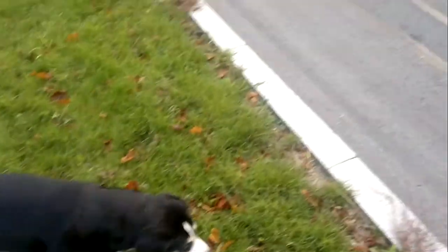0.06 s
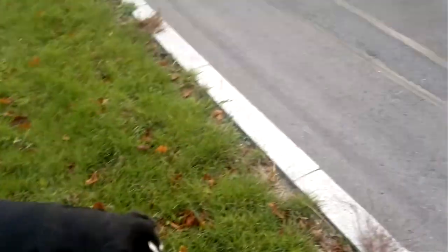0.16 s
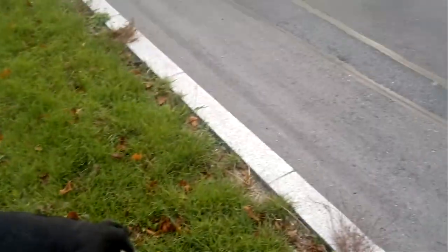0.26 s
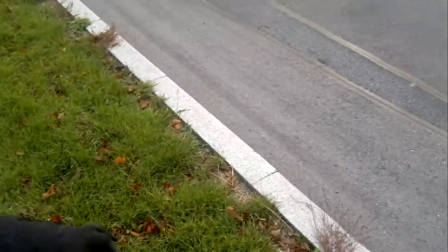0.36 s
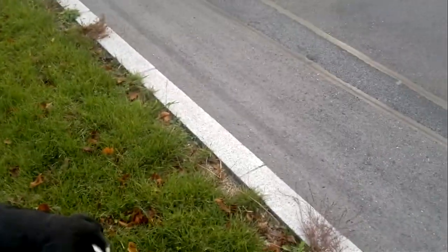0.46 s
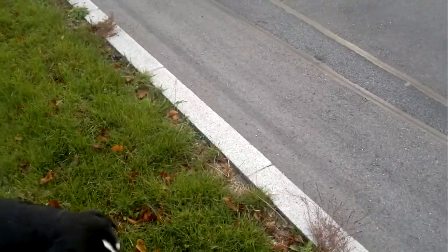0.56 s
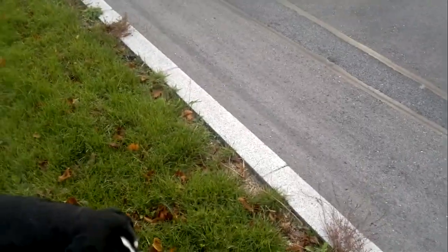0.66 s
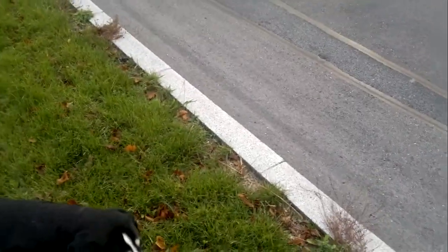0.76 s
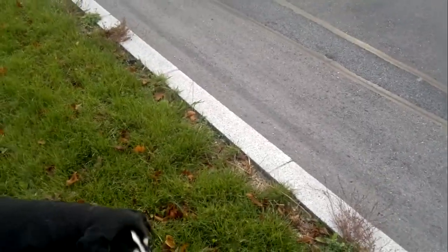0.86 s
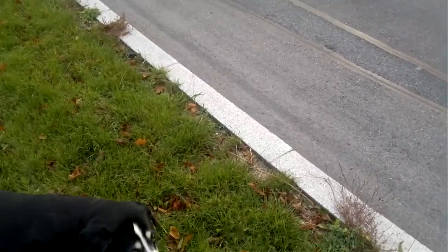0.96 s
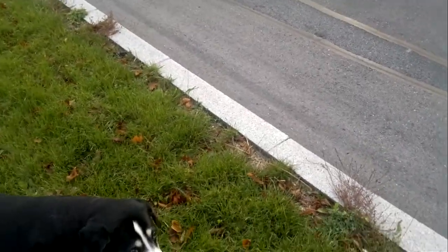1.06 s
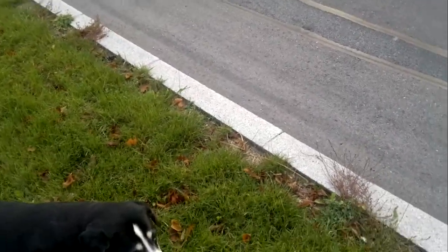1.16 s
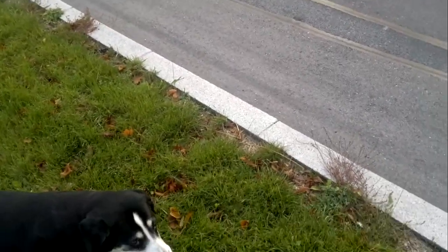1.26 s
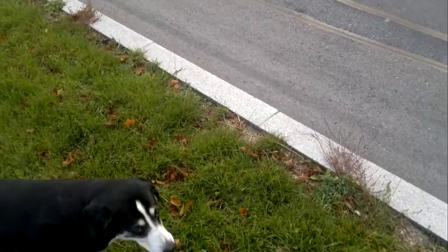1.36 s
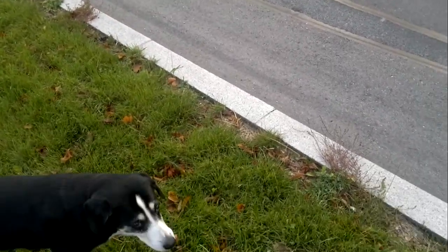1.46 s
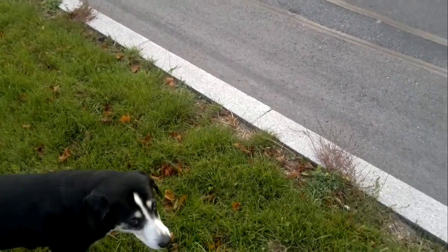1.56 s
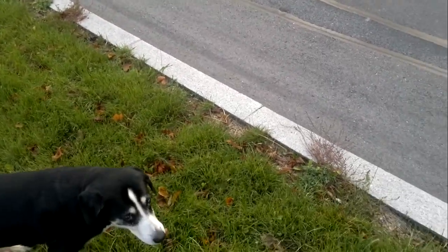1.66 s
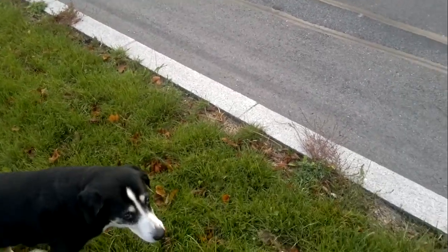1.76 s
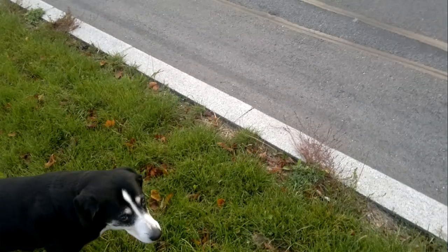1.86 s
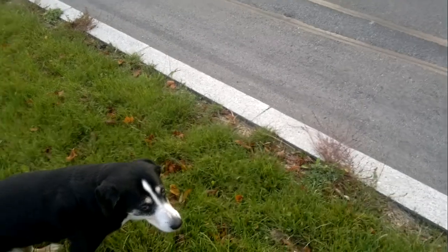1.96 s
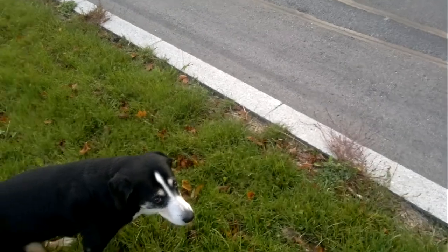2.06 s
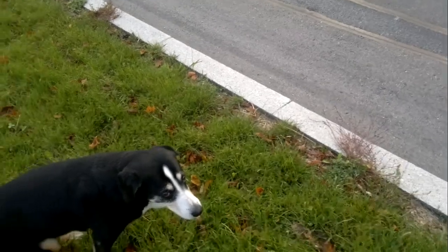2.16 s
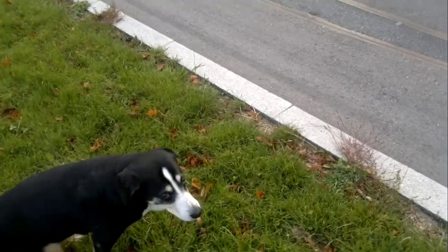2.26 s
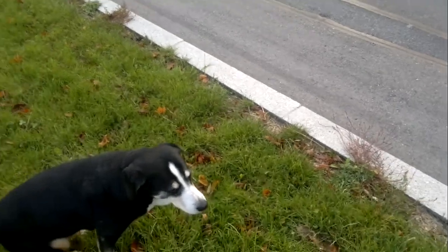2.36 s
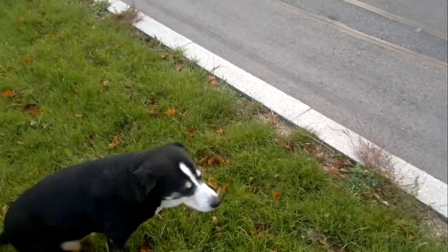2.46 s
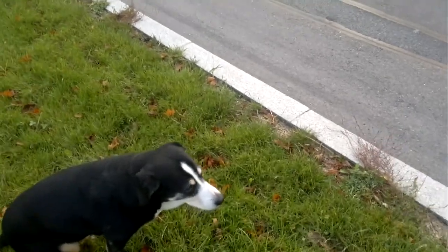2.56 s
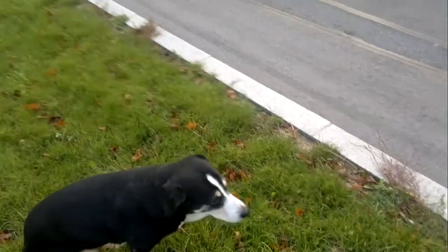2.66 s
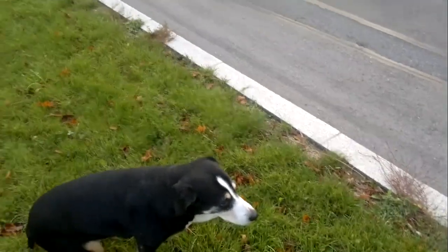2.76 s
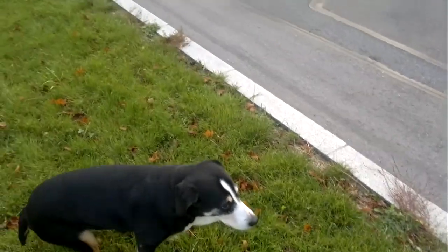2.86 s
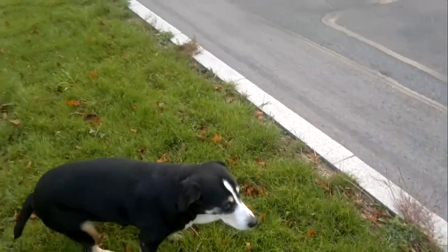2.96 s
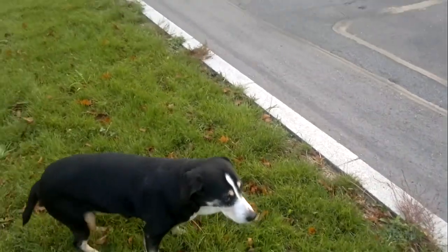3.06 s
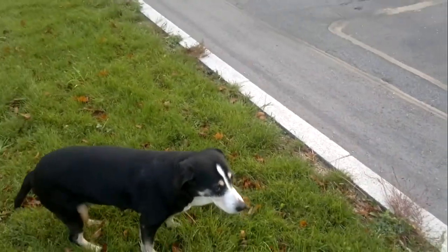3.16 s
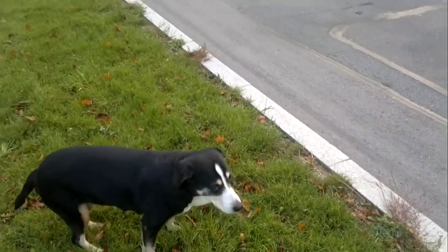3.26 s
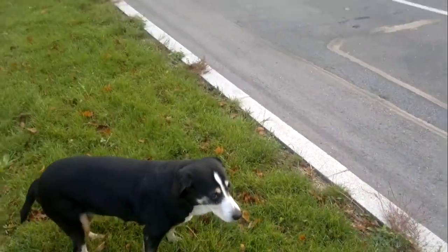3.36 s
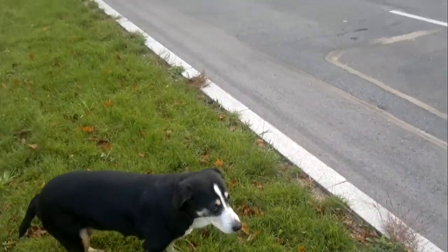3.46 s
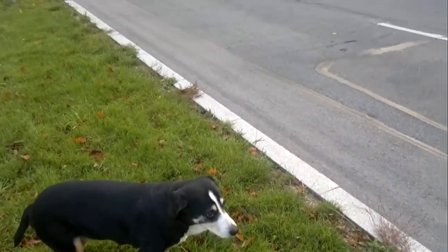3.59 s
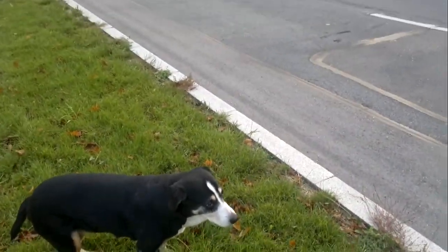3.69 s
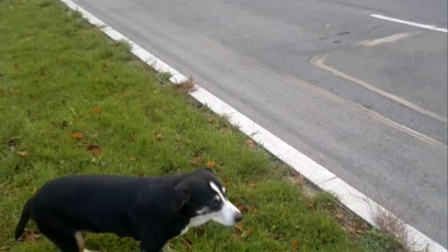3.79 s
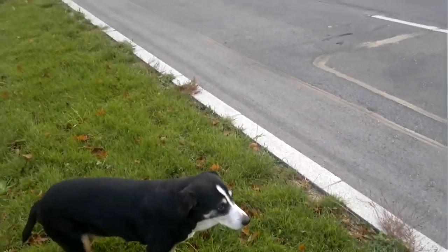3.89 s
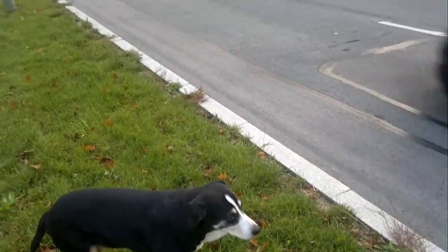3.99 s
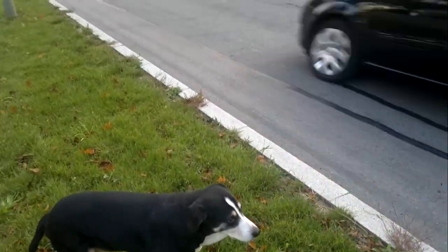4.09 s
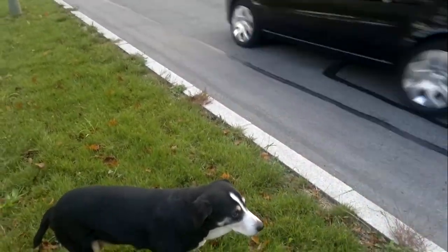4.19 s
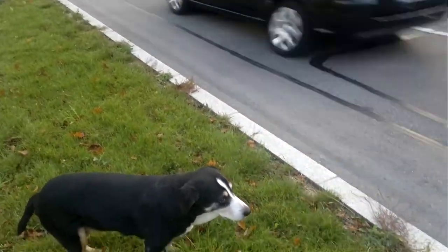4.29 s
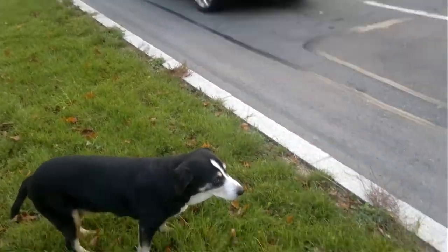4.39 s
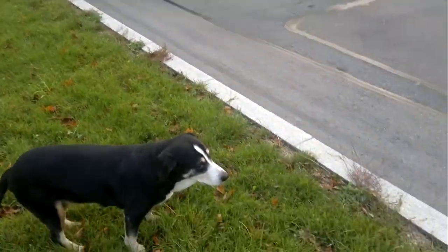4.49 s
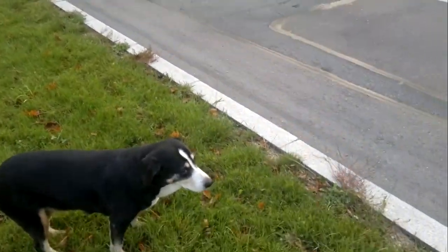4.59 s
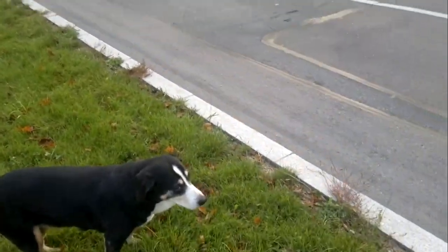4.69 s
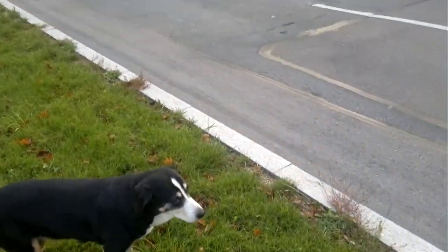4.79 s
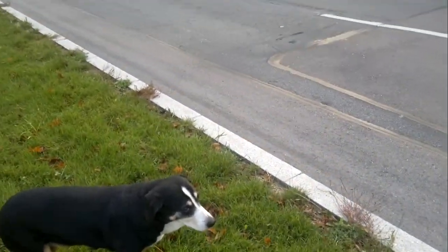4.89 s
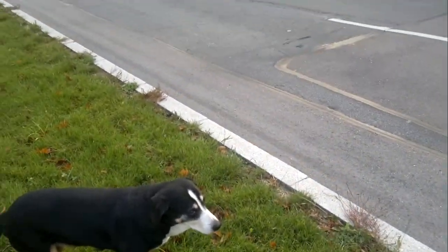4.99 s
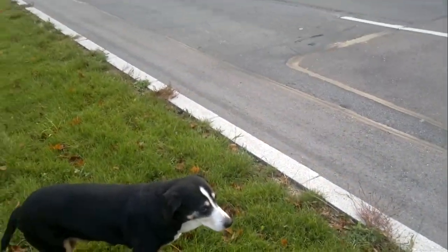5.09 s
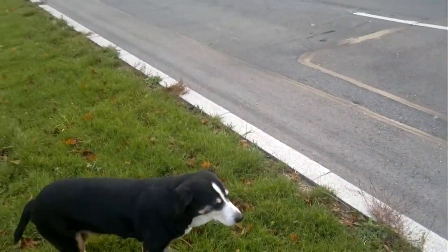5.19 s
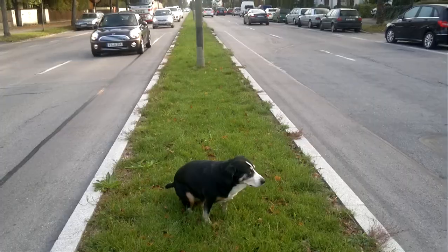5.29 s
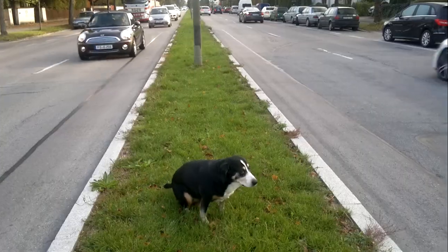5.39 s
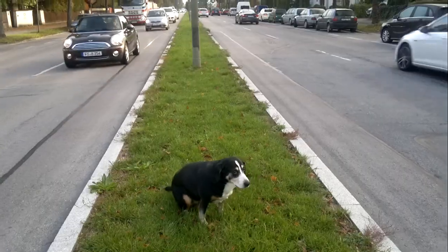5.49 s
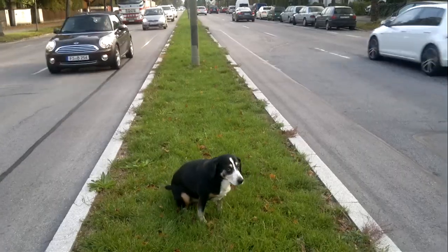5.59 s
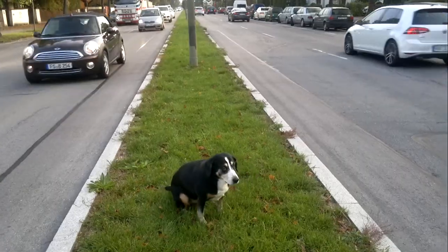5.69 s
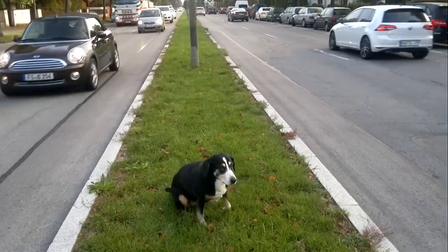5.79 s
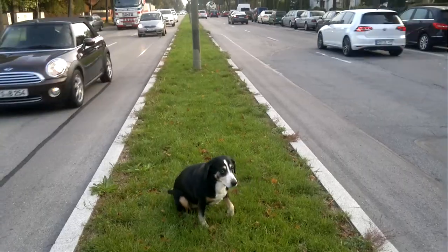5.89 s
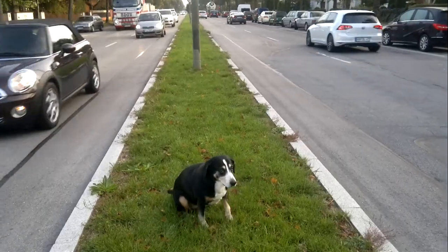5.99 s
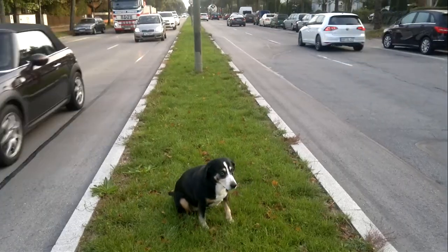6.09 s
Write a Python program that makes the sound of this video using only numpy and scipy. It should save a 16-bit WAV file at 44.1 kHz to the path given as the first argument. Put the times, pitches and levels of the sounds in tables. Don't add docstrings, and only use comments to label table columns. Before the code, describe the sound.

Steady road rumble with fumbling thumps on the microphone, one car whooshing by close, a sudden dropout, and louder cars snapping in.

```python
import sys
import numpy as np
from scipy import signal
from scipy.fft import rfft, irfft, next_fast_len
from scipy.io import wavfile
from scipy.ndimage import uniform_filter1d, map_coordinates

SR = 44100
rng = np.random.default_rng(int(sys.argv[2]) if len(sys.argv) > 2 else 0)


def magnitude_from_level(level_db):
    exponent = np.asarray(level_db, float) / 20
    return 10 ** exponent


def master(y):
    cut = np.clip(np.atleast_2d(y).T, -1, 1)
    pcm = np.round(cut * 32767)
    wavfile.write(sys.argv[1], SR, pcm.astype(np.int16))


N = 271151

# (closest time [s], level [dB], approach [s], departure [s], brightness [dB])
CARS = [
    [(-2, -36, .3, .8, 1.5), (3.65, -36.5, 0.32, .2, -6), (4.22, -23, 0.31, 0.22, 0.5),
     (5.05, -36.5, 0.41, 0.83, 1), (5.65, -27.5, 0.21, .3, -1.5)],
    [(5.68, -24, 0.26, 0.23, -1.5), (6.1, -28.5, 0.25, 0.56, -2)],
]
# (far lanes [dB], level over a car's roar [dB], lead before closest [s],
# fall with distance [power], share of brightness [ratio])
ROLLING_PARTS = [
    (-49, -5, 0.32, 1.217, -0.1),
    (-38, 0.16, 0.014, 1.173, -0.9),
    (-47, -1.5, 0.089, 1.84, 2.67),
    (-94, -22, 0.11, 2.7, 3),
]
BORDERS_HZ = [320, 800, 2400, 5800]
# (frequency [Hz], level [dB per Hz])
DRUM = [(150, -26.5), (250, 1), (301, -10), (393, -9.5), (531, -1.5), (718, -5), (1000, 5.5), (1300, -31),
        (2200, -120)]
# (frequency [Hz], level [dB per Hz])
ROAR = [(380, -41.5), (650, -2), (729, -12), (986, -1), (1240, -1), (1690, -5), (1870, -3), (2540, -7.5),
        (2980, -2.5), (3410, -3.5), (3820, -8), (5400, -23), (7020, -65.5), (11900, -120)]
# (frequency [Hz], level [dB per Hz])
SPRAY = [(4500, 5.5), (6000, -6.5), (7000, -17), (8000, -25), (10000, -28.5), (12000, -38.5), (14000, -36),
         (15500, -47.5)]
# (frequency [Hz], likeness [0-1])
LIKENESS = [(60, 0.73), (250, 1), (500, 1), (1000, 0.8), (2000, 1), (4000, 0.29), (8000, .1)]
# (time [s], extra delay [ms], strength [0-1])
BOUNCE = [(0, 0.98, 0.2), (.4, 1.07, 0.27), (1.3, 0.88, 0), (1.55, 1.1, 0), (2.3, 0.73, 0), (3, 0.97, 0.06),
          (3.7, 0.86, 0.11), (4.2, 0.77, 0.18), (4.6, .8, 0.23), (5.1, 1.1, 0.04), (5.7, 1.03, 0.06),
          (6.15, 1.02, 0.2)]
# (time [s], level [dB])
EXHAUSTS = [(0, -40), (.3, -33.5), (.56, -37.5), (1.2, -36), (1.9, -36), (2.3, -34), (2.8, -34),
            (3.1, -34.5), (3.45, -35), (3.72, -30), (4.2, -28.5), (4.55, -33.5), (4.8, -37), (5.05, -34.5),
            (5.34, -34), (5.6, -20.5), (5.75, -22), (6.13, -27)]
# (frequency [Hz], level [dB per Hz])
RUMBLE = [(20, -22), (30, -16), (42, 0.5), (75, 0.5), (114, -5.5), (198, -6), (300, -9.5), (450, -8)]
# (time [s], firing rate [Hz], level [dB])
DISTANT = [(0, 272, -46), (.4, 270, -71), (.7, 269, -41), (1, 268, -50)]
# (time [s], whine [Hz], level [dB])
GEARBOX = [(2.8, 246, -41), (3, 243, -36), (3.3, 240, -41.5), (3.8, 236, -48), (4.4, 232, -47),
           (4.7, 229, -38), (5, 227, -43), (5.34, 224, -39.5)]
# (time [s], firing rate [Hz], level [dB])
PASSING = [(3.3, 83.2, -39), (3.6, 81.7, -37), (3.9, 79.1, -39.5), (4.1, 75.9, -34.5), (4.25, 74, -33.5),
           (4.4, 74, -45)]
# (time [s], frequency [Hz], level [dB])
BOOM = [(4.12, 212, -41.5), (4.19, 213.3, -29.5), (4.26, 204.3, -37)]
# (time [s], firing rate [Hz], level [dB])
PULLING = [(4.4, 86.6, -42.5), (4.7, 85.04, -38.5), (4.95, 87.1, -37), (5.05, 85.9, -27.5),
           (5.2, 86.1, -32), (5.34, 84.9, -32)]
# (time [s], firing rate [Hz], level [dB])
ONCOMING = [(5.6, 72.94, -25.5), (5.7, 73.1, -22.5), (5.8, 74, -39), (5.9, 71.5, -32), (6, 70.7, -23),
            (6.15, 72.5, -37)]
# (order of firing rate, level [dB])
FIRING = [(.5, -4.5), (1, 1), (1.5, -20.5), (2, -9), (2.5, -17), (3, -10)]
# (order of firing rate, level [dB])
LUGGING = [(.5, -8), (1, 2.5), (1.5, -12.5), (2, -8)]
# (time [s], head start of the right port [ms])
LEAD = [(0, 0.23), (1.2, 0.29), (1.6, 0.16), (3.8, 0.26), (4.2, 0.15), (4.8, -0.23), (5.2, 0.2),
        (5.7, -0.2)]
# (time [s], palm grip [0-1], finger across the slit [0-1])
GRIP = [(0, 1, 1), (.5, 1, 1), (.9, 1, .95), (1.5, 0.93, 1), (2, 0.6, 1), (2.3, 0.75, 0.9), (2.8, 0.4, 1),
        (3.38, 0.27, 0.8), (3.52, 0.27, .02), (3.87, .1, 0.05), (4.03, .2, .28), (4.2, 0.13, 0.2),
        (4.47, 0.21, 0.16), (4.79, 0.25, .55), (5.1, .1, .22), (5.34, 0.14, 0.07), (5.62, 0.05, 0.22),
        (6.15, 0.05, 0.1)]
# (loose [dB], tight [dB])
COVER_DB = [
    (11, 29.5),
    (8, 17),
    (13.1, 20.5),
    (9, 48.5),
    (33.2, 30.5),
]
# (frequency [Hz], level against the whole sound [dB])
MASKED = [(5000, -91), (6500, -75.5), (9000, -72), (14000, -78.5), (15000, -87.5)]
# (frequency [Hz], level [dB per Hz])
CIRCUIT = [(3000, 1), (6000, -10.5), (8000, -9.5), (11000, -12), (14500, -17), (14900, -6), (15300, -22)]
# (time [s], length [s], level [dB])
SLEEVE = [(.2, .12, -70), (1.112, .3, -76), (1.896, 0.42, -68.5), (2.302, 0.1, -60.5), (2.487, 0.099, -63),
          (2.744, .1, -68.5), (2.948, 0.1, -64), (5.633, 0.072, -63.5)]
# (frequency [Hz], level [dB per Hz])
CLOTH = [(4000, -9), (6000, -1), (10000, -4.5), (12500, -8), (15000, -28)]
# (time [s], peak [dB], frequency [Hz], length [cycles], in or out [sign])
BUMPS = [(1.118, -21.5, 207, 6.3, 1), (1.783, -17, 142, 0.78, 1), (2.3215, -6, 121, 1.13, 1),
         (2.337, -1.5, 100, 1.46, -1), (2.347, -5, 199, 0.92, 1.1), (2.36, -15.5, 68.5, 2.4, 1),
         (2.404, -10, 90.8, 0.95, 1), (2.503, -13.5, 190, 1.3, 1), (2.511, -16, 108.4, 1.8, 1),
         (2.5805, -10, 118, 1.5, -1), (2.6315, -11, 278, 1.1, -1), (2.638, -14, 80.3, 0.88, 1),
         (2.845, -18, 69, 2.2, 1)]
# (time [s], peak [dB], ring [Hz], lower shell ring [dB], snap [dB])
TICKS = [(2.3197, -24.5, 4800, -7, -7), (2.3388, -20, 4800, -7, -17), (2.348, -21, 4800, -2, -14),
         (2.6305, -11, 4600, 2.5, 1), (2.984, -18, 4560, -1, -3.5), (3.026, -14, 4760, 1, -10),
         (3.1162, -11, 4670, 2, -16.5), (3.3906, -15.5, 4800, -7, -14.5), (5.7454, -18, 5100, -4, -24)]
# (time [s], peak [dB], frequency [Hz], length [cycles], in or out [sign])
PALM = [(2.605, -46.5, 68.3, 1.5, 1), (2.72, -39, 55.4, 1.4, 1), (2.99, -39, 72, 2.5, 1),
        (3.03, -33, 56, 1.8, 1), (3.1, -51, 69.9, 2, 1), (3.18, -35, 92, 1.2, 1), (3.25, -31, 59.7, 2.3, 1),
        (3.37, -48, 59, 1.5, 1), (3.52, -26, 111, 1.8, 1)]

GAP_S, GAP_HALF_LENGTH_S, GAP_DB = 4.14, .17, 21
CUT_S, DYING_DB, DYING_S, DYING_DB_PER_S = 5.3497, -30, .018, 6000
BACK_S, BACK_DB_PER_S, BACK_DB, SETTLE_S = 5.5765, 9600, -13, .018


def unit(x):
    return x / np.sqrt(np.mean(x ** 2, axis=-1, keepdims=True) + 1e-20)


def along(points, hz):
    f, v = np.transpose(points)
    return np.interp(np.log(hz + 1), np.log(f + 1), v)


def curves(rows):
    s, *cols = np.transpose(rows)
    return np.array([np.interp(np.arange(N) / SR, s, c) for c in cols])


def wobble(rate):
    knots = rng.standard_normal(int(N * rate / SR) + 4)
    return map_coordinates(knots, [np.arange(N) * rate / SR])


def filtered(x, response):
    m = next_fast_len(N + 8192)
    return irfft(rfft(x, m) * response(np.fft.rfftfreq(m, 1 / SR)), m)[..., :N]


def below(hz, edge_hz):
    return 1 / (1 + (hz / edge_hz) ** 14)


def rush(spectrum, lo_hz, hi_hz, patchy_db):
    z = signal.stft(rng.standard_normal((2, N)), nperseg=512)[2]
    field = uniform_filter1d(rng.standard_normal(z.shape[1:]), size=5, axis=0)
    field = uniform_filter1d(field, size=12, axis=1)
    one, other = signal.istft(z * magnitude_from_level(patchy_db * field / field.std()), nperseg=512)[1][:, :N]

    def alike(hz):
        return np.clip(along(LIKENESS, hz), -1, 1)

    def band(hz):
        return magnitude_from_level(along(spectrum, hz)) * np.sqrt(below(hz, hi_hz) * (1 - below(hz, lo_hz)))

    right = filtered(one, alike) + filtered(other, lambda hz: np.sqrt(1 - alike(hz) ** 2))
    return filtered(np.array([one, right]), band)


def passing(over_db, lead_s, fall, bright):
    t = np.arange(N) / SR
    change_s = BACK_S - .1
    power = 0
    for cars, heard in zip(CARS, (t < change_s, t >= change_s)):
        for s, db, approach_s, departure_s, bright_db in cars:
            away = (t - s + lead_s) / np.where(t < s - lead_s, approach_s, departure_s)
            peak = magnitude_from_level(2 * (db + over_db + bright * bright_db))
            power = power + heard * peak / (1 + away ** 2) ** fall
    return power


def tyres(cover_db):
    delay_ms, strength = curves(BOUNCE)
    strength = np.clip(strength, 0, 1)
    late = np.arange(N) - delay_ms * SR / 1000
    joints = wobble(4.9)
    colours = (DRUM, ROAR, ROAR, SPRAY)
    patchiness_db = (0.857, 0.68, 1.26, 2.6)
    tops_hz = [*BORDERS_HZ[1:], SR]
    total = 0
    for (far_db, *near), colour, lo_hz, hi_hz, patchy_db, hand_db in zip(
            ROLLING_PARTS, colours, BORDERS_HZ, tops_hz, patchiness_db, cover_db[1:]):
        db = 10 * np.log10(magnitude_from_level(2 * far_db) + passing(*near))
        part = rush(colour, lo_hz, hi_hz, patchy_db)
        bounced = np.array([map_coordinates(port, [late], order=3) for port in part])
        part = part + strength * bounced
        heard = magnitude_from_level([db + 7.0, db + 3.5 - hand_db])
        total = total + heard * magnitude_from_level(0.071 * joints + 0.23 * wobble(25)) * unit(part)
    return total


def engine(rows, orders):
    hz, db = curves(rows)
    turn = 2 * np.pi * np.cumsum(hz * (1 + .005 * wobble(12))) / SR
    hum = 0
    for order, level in orders:
        hum = hum + magnitude_from_level(level + 2.2 * wobble(10)) * np.sin(order * turn + rng.uniform(0, 2 * np.pi))
    t = np.arange(N) / SR
    near = np.clip(np.minimum(t - rows[0][0], rows[-1][0] - t) / 0.24 + 1, 0, 1)
    return hum * near * magnitude_from_level(db + 4.5)


def exhausts(cover_db):
    db = curves(EXHAUSTS)[0] + 5 + 0.74 * wobble(6.6) + 2.0 * wobble(30)
    rumble = magnitude_from_level(db) * unit(rush(RUMBLE, 0.82, BORDERS_HZ[0], patchy_db=-0.1))
    hum = engine(DISTANT, [(0.98, 0.0072)]) + engine(GEARBOX, [(1, 0.0061)])
    hum = hum + engine(PASSING, FIRING) + engine(BOOM, [(1, 2.5), (0.78, -2)])
    hum = hum + engine(PULLING, LUGGING) + engine(ONCOMING, FIRING)
    return (rumble + hum) * magnitude_from_level([0 * db, -cover_db[0]])


def masked_treble(x):
    hz, _, z = signal.stft(x, SR, nperseg=1024)
    power = np.abs(z) ** 2 + 1e-16
    band_power = uniform_filter1d(uniform_filter1d(power, size=14, axis=1), size=3, axis=2)
    whole_power = uniform_filter1d(power.sum(axis=(0, 1)), size=9)
    luck = np.repeat(rng.standard_normal((2, 37, z.shape[2])), repeats=14, axis=1)
    luck = uniform_filter1d(luck, size=4, axis=2)
    spare_db = 10 * np.log10(band_power) - 10 * np.log10(whole_power) - along(MASKED, hz)[:, None]
    spare_db = spare_db + 6 * luck[:, :len(hz)]
    spare_db = spare_db - np.array([0, 4])[:, None, None]
    kept = np.where(hz[:, None] > 5000, np.clip(spare_db / 2 + .5, 0, 1), 1)
    return signal.istft(z * kept, SR, nperseg=1024)[1][:, :N]


def circuit_hiss():
    return magnitude_from_level([[-70], [-86]]) * unit(rush(CIRCUIT, 2800, SR, patchy_db=4.5))


def sleeve():
    t = np.arange(N) / SR
    swell = 0
    for s, length, db in SLEEVE:
        swell = swell + magnitude_from_level(db) * np.sin(np.pi * np.clip((t - s) / length, 0, 1)) ** 2
    return swell * magnitude_from_level([[0], [-20]]) * unit(rush(CLOTH, 4000, SR, patchy_db=-1.0))


def pushes(rows):
    out = np.zeros(N)
    for s, db, hz, cycles, direction in rows:
        u = np.arange(int(cycles / hz * SR)) * hz / SR
        hump = np.sin(np.pi * u / cycles)
        push = np.sign(direction) * magnitude_from_level(db) * hump * np.sin(2 * np.pi * u)
        out[round(s * SR):][:len(u)] -= push
    return out


def ticks():
    out, t = np.zeros(N), np.arange(400) / SR
    for s, db, hz, shell_db, snap_db in TICKS:
        ring = np.sin(2 * np.pi * hz * t) + magnitude_from_level(shell_db) * np.sin(2 * np.pi * 3100 * t)
        ring = ring * magnitude_from_level(-60 * t / 0.0037) * (1 - np.exp(-t / 0.00022))
        snap = magnitude_from_level(snap_db - 60 * t / 0.0017) * rng.standard_normal(len(t))
        out[round(s * SR):][:len(t)] += magnitude_from_level(db + 13) * (ring + snap)
    return filtered(out, lambda f: 1 / (1 + 1j * f / 5000) ** 4)


def soft_overload(x):
    return x / (1 + np.abs(x / .98) ** 8) ** (1 / 8)


def scene_change():
    t = np.arange(N) / SR
    dying_db = DYING_DB - DYING_DB_PER_S * np.clip(t - CUT_S - DYING_S, 0, None)
    out_db = np.where(t < CUT_S, 0, dying_db)
    rising_db = BACK_DB - BACK_DB_PER_S * (BACK_S - t)
    settling_db = BACK_DB * np.clip(1 - (t - BACK_S) / SETTLE_S, 0, 1)
    in_db = np.where(t < BACK_S, rising_db, settling_db)
    return magnitude_from_level(np.maximum(out_db, in_db))


def hand_cover():
    palm, finger = curves(GRIP)
    shut = (palm, palm, palm, finger, finger)
    cover_db = [loose + (tight - loose) * grip for (loose, tight), grip in zip(COVER_DB, shut)]
    from_gap = (np.arange(N) / SR - GAP_S) / GAP_HALF_LENGTH_S
    cover_db[-1] = cover_db[-1] - GAP_DB / (1 + from_gap ** 8)
    return cover_db


def scene():
    cover_db = hand_cover()
    left, right = tyres(cover_db) + exhausts(cover_db)
    ahead = np.arange(N) + curves(LEAD)[0] * SR / 1000
    right = map_coordinates(right, [ahead], order=3, mode="nearest")
    street = np.array([left, right])
    handling = np.array([pushes(BUMPS), pushes(PALM)]) + ticks() * magnitude_from_level([[0], [-55]])
    return street + sleeve() + handling


def top_cut(x):
    return signal.sosfilt(signal.butter(12, 15700, fs=SR, output="sos"), x)


def record(dry):
    x = (masked_treble(dry) + circuit_hiss()) * scene_change()
    return top_cut(soft_overload(x))


dry = scene()
out = record(dry)
master(out)
```